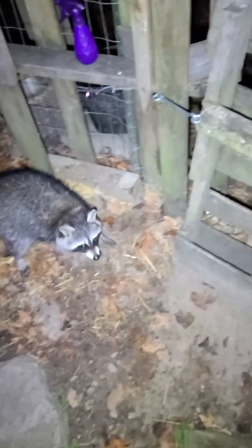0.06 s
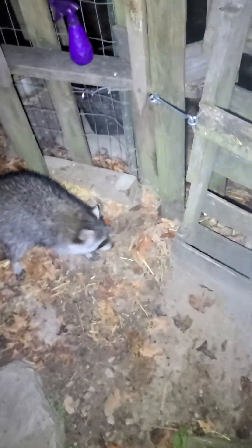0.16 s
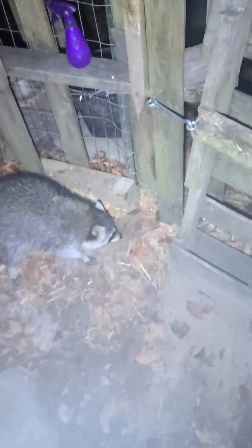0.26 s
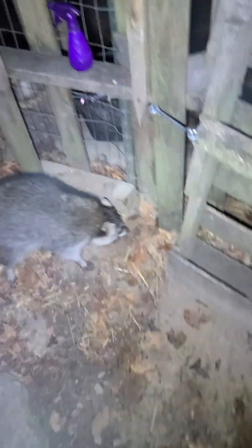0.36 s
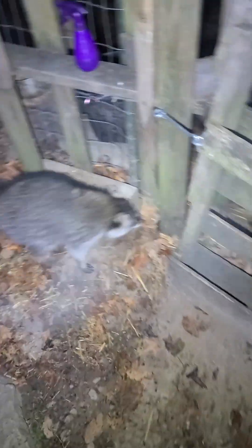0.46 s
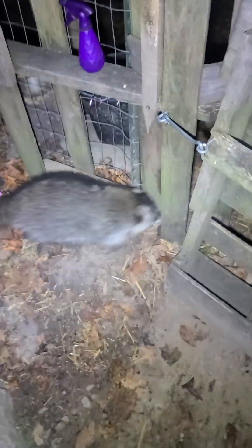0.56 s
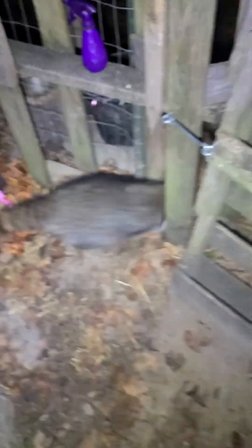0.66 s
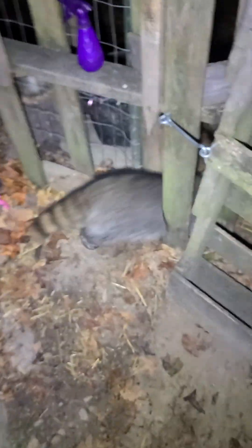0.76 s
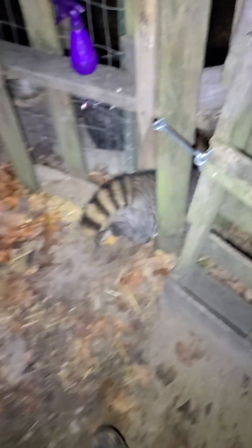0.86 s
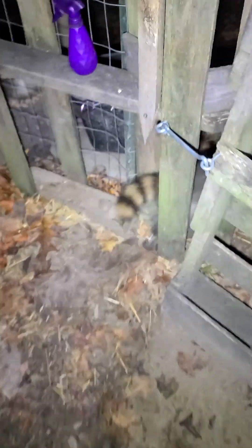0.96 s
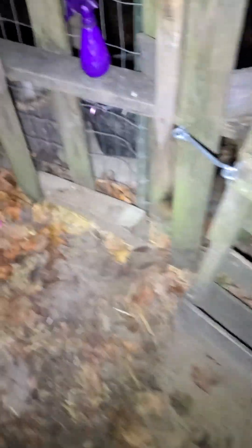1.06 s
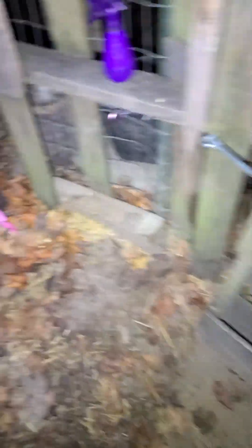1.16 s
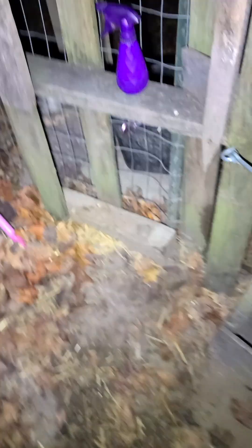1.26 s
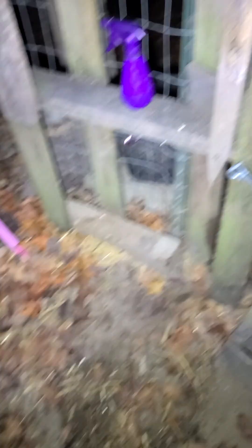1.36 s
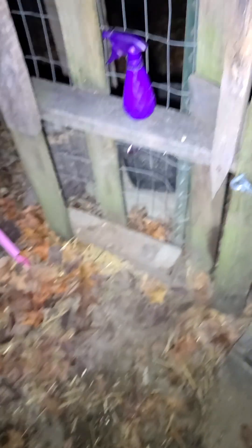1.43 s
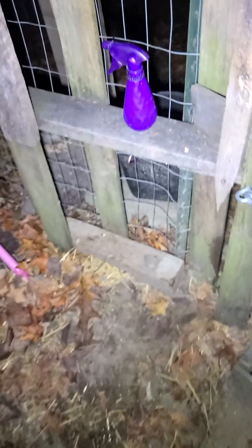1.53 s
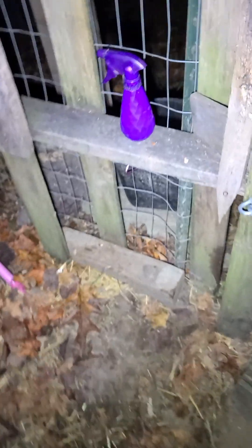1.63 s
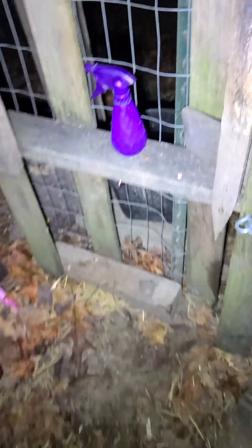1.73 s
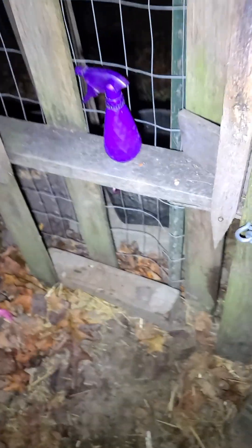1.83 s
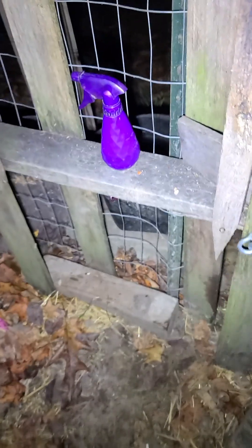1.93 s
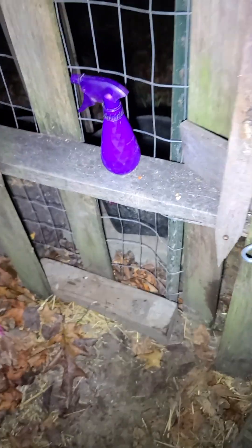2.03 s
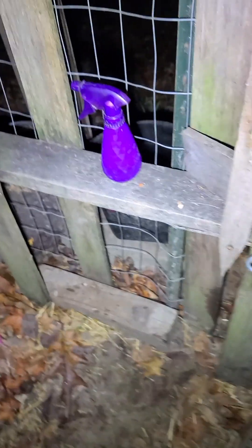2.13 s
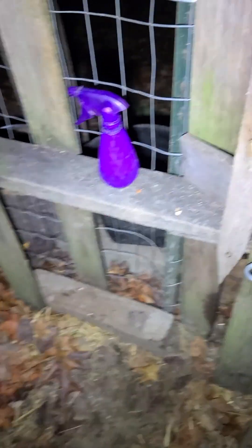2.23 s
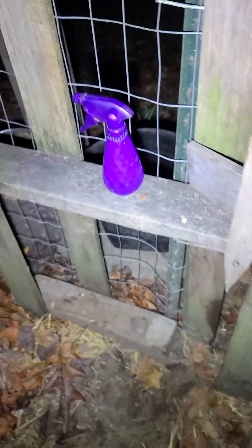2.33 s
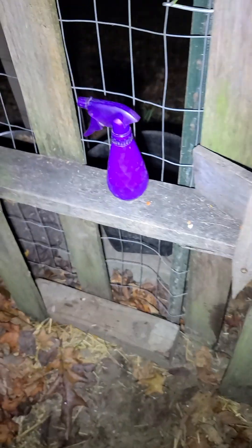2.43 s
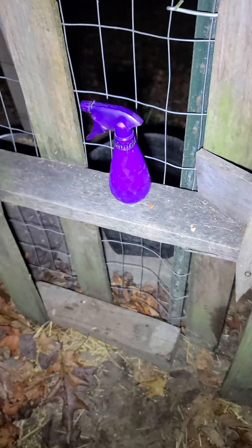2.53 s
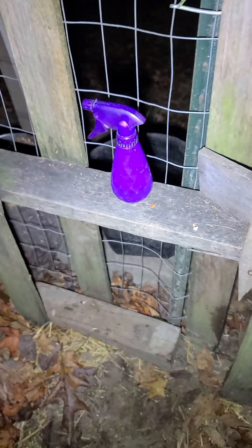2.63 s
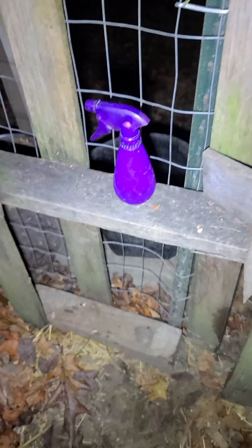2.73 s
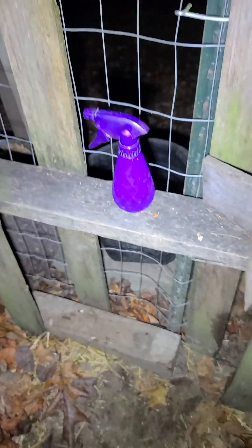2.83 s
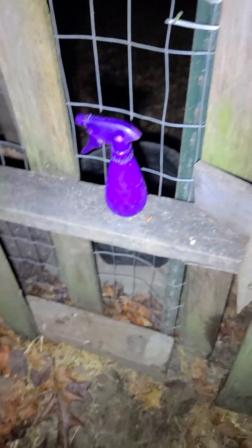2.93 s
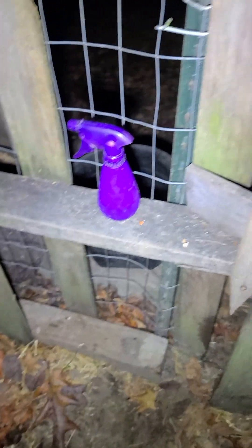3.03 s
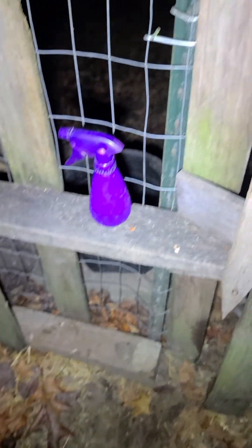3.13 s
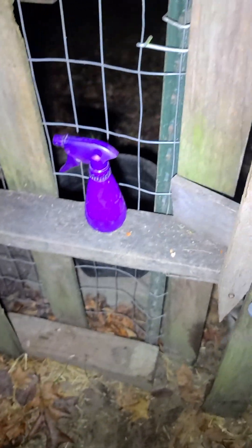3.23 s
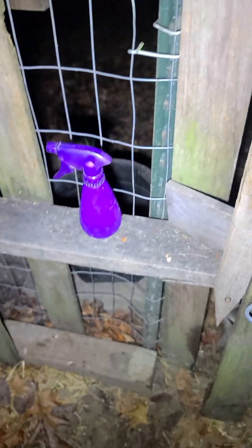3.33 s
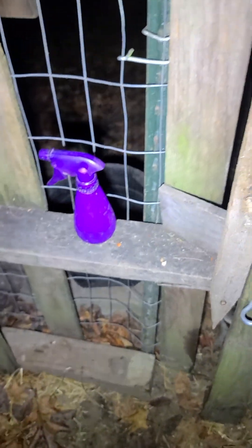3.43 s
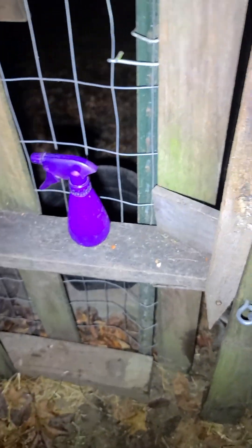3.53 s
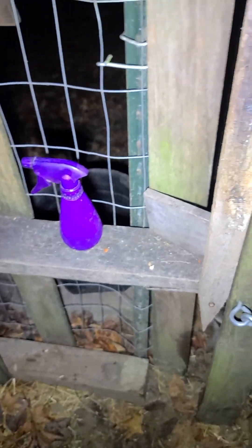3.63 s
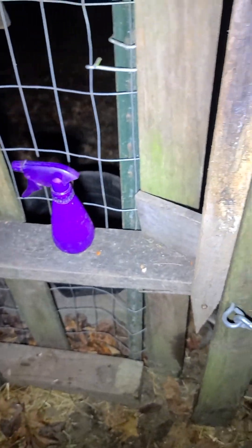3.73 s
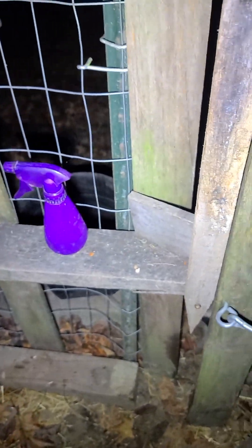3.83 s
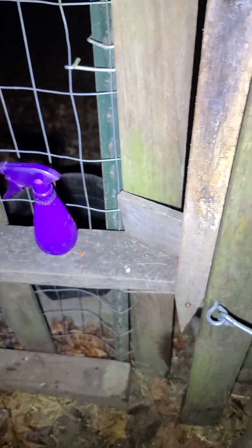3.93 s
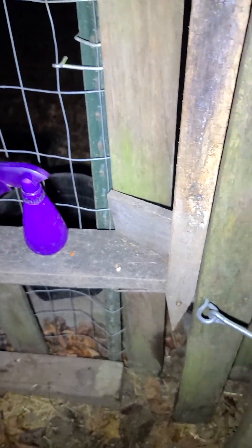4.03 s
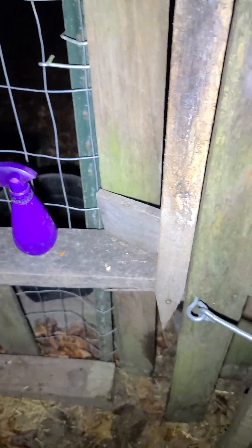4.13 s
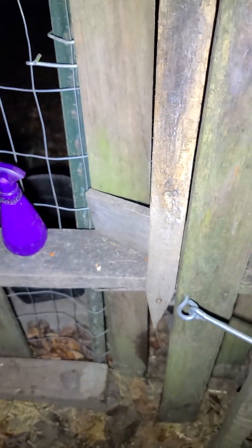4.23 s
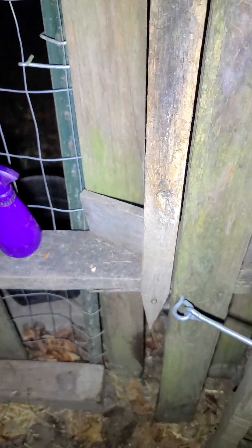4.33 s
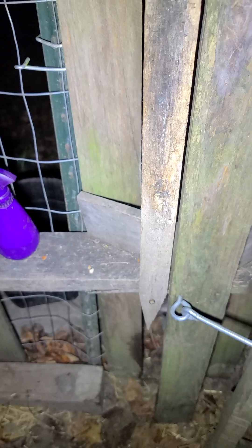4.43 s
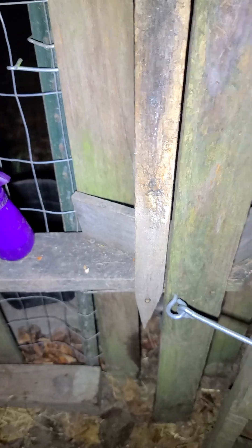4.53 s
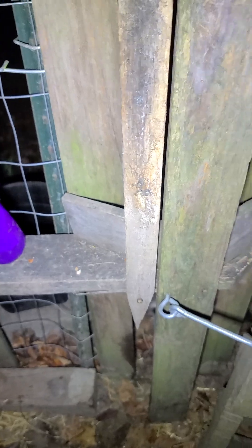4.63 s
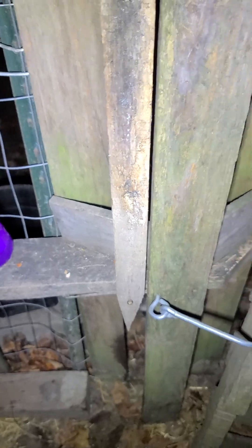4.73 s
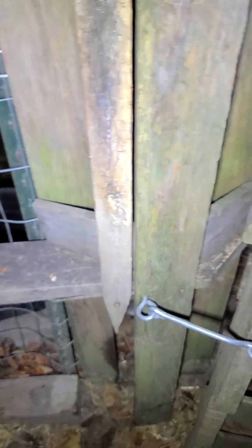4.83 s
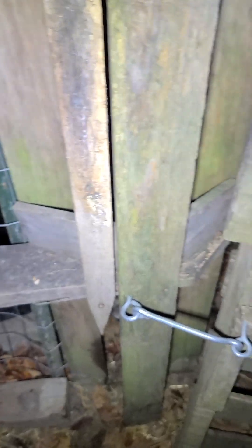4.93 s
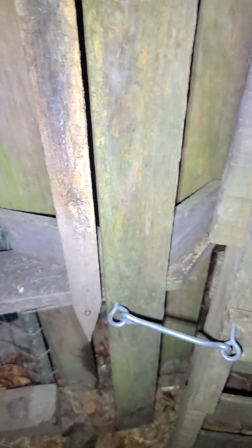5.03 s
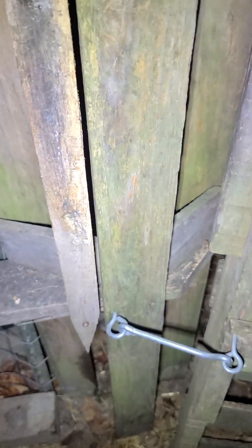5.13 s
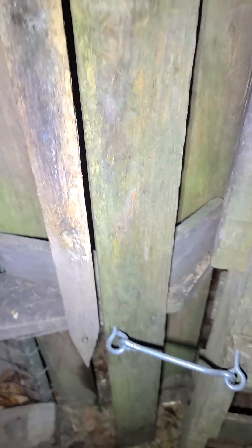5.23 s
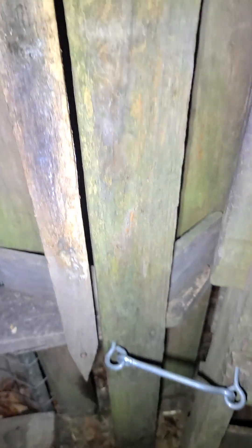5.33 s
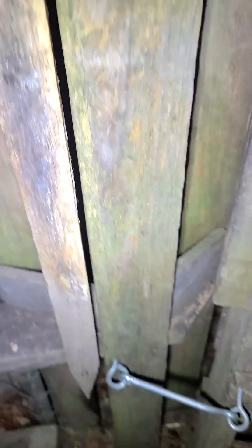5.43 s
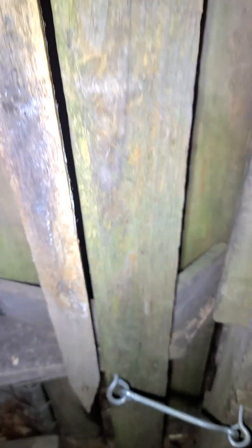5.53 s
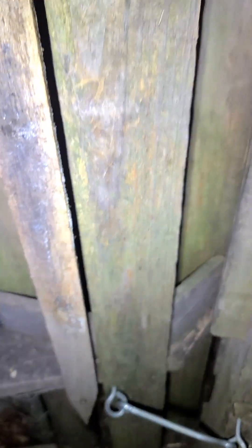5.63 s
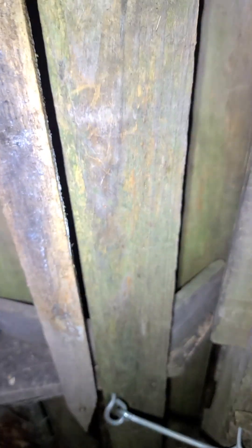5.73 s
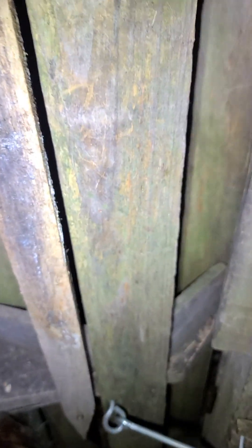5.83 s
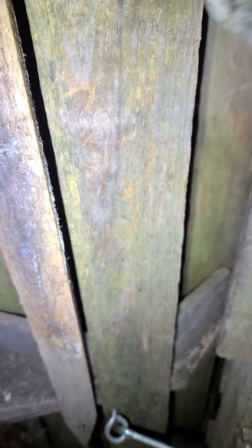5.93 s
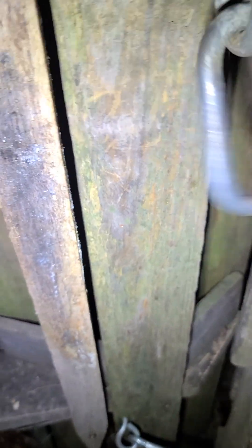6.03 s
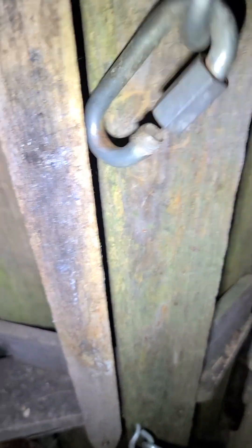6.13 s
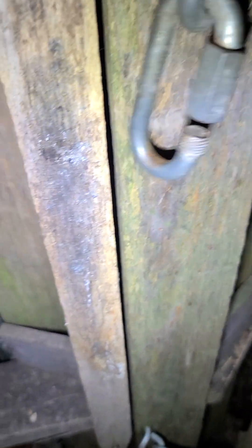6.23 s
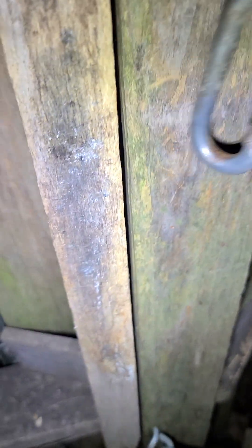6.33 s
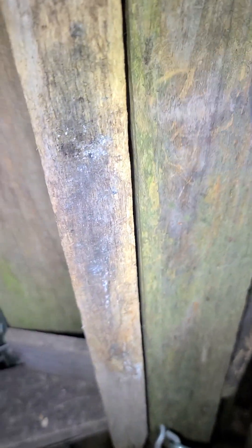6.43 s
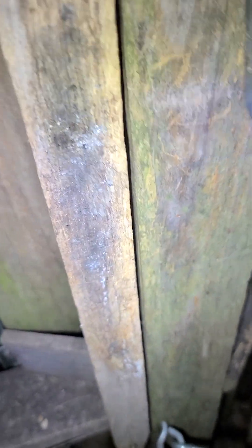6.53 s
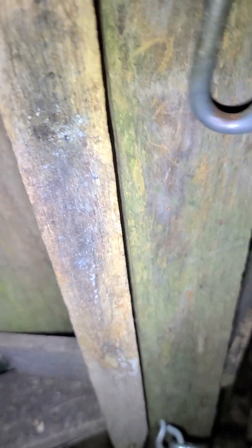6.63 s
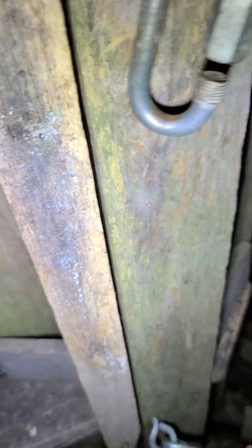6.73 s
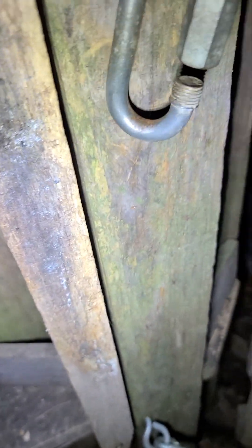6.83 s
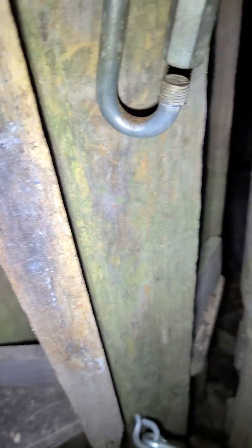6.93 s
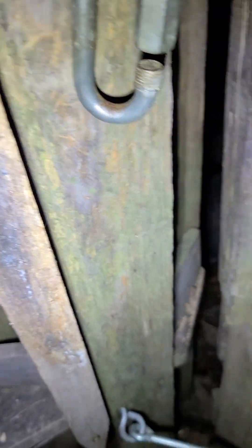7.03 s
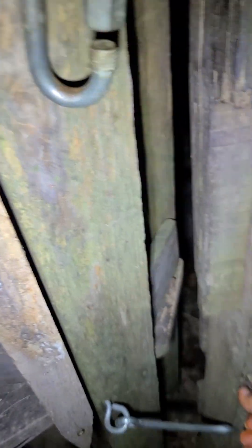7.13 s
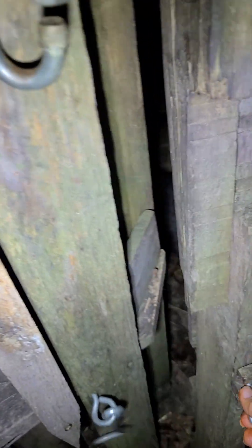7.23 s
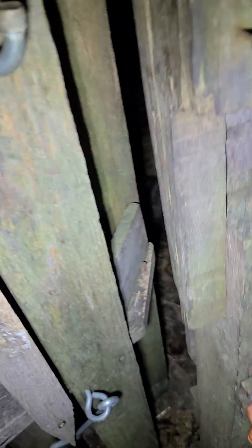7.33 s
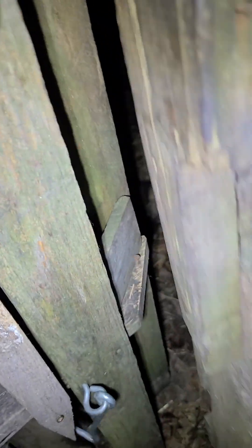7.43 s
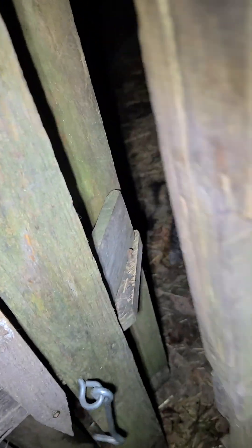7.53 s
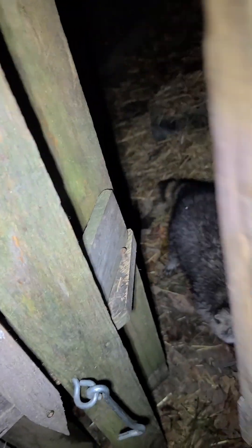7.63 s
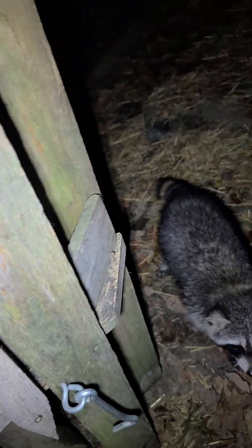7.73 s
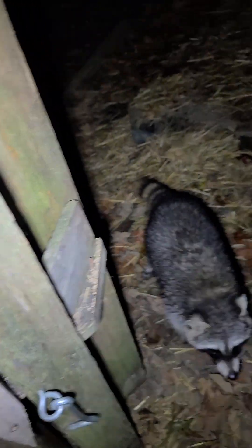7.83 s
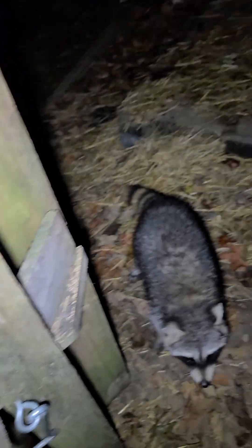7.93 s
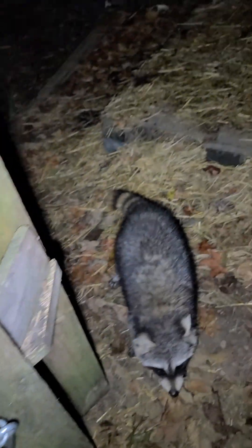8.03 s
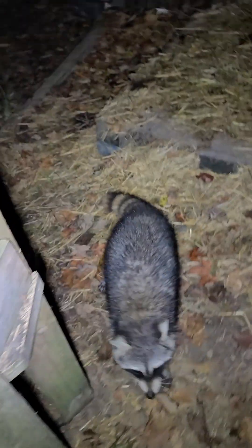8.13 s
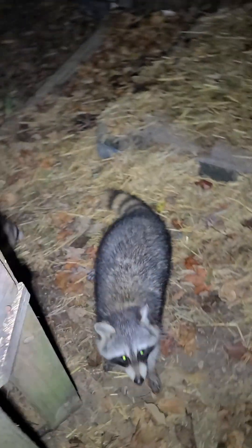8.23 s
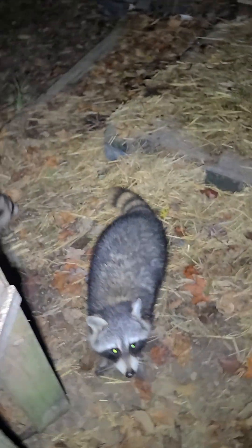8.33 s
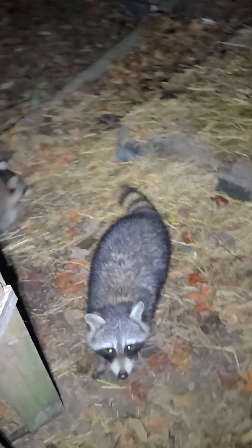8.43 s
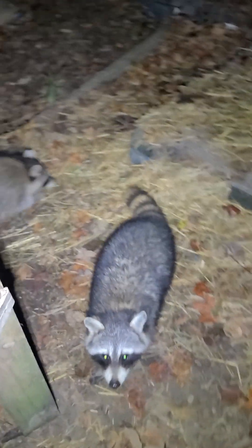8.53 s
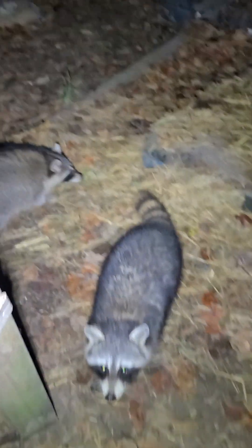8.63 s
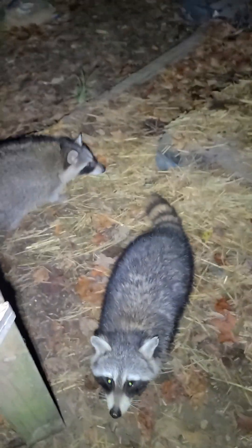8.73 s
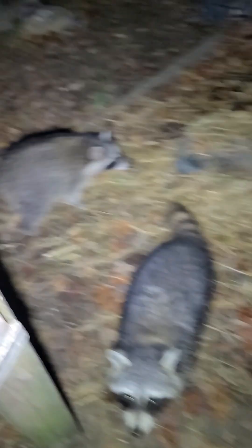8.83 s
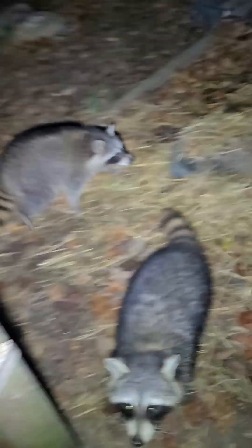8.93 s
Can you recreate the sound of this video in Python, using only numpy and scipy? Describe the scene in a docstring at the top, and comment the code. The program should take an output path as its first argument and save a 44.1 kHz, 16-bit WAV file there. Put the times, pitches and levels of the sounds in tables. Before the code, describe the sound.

A wooden gate knocks and clatters as a steel hook latch is worked loose, with crackling leaves and distant traffic behind.

```python
"""Dry leaves rustle and snap under paws and feet, over distant traffic: a yard at night, on a phone.
A wooden gate is bumped and creaks; each blow and its chatter ring the modes of the boards.
A steel link and a hook-and-eye latch are rattled loose, clinking in high, fading tones.
The gate swings open, drags over the leaves and knocks against its post."""
import sys
import numpy as np
from scipy import signal
from scipy.fft import rfft, irfft
from scipy.io import wavfile
from scipy.ndimage import uniform_filter1d

SR = 44100
rng = np.random.default_rng(int(sys.argv[2]) if len(sys.argv) > 2 else 0)


def bounce(signal):
    """Save signal as a 16-bit WAV file at the path given by the first command-line argument."""
    frames = np.transpose(np.atleast_2d(signal))
    limited = np.clip(frames, -1, 1)
    pcm = np.round(limited * 32767).astype(np.int16)
    wavfile.write(sys.argv[1], SR, pcm)


N = 395577


def undb(db):
    return 10 ** (np.asarray(db) / 20)


def unit(x):
    """Scale to rms 1."""
    return x / np.sqrt(np.mean(x ** 2))


def band(x, lo_hz, hi_hz):
    """Butterworth band-pass."""
    return signal.sosfilt(signal.butter(3, [lo_hz, hi_hz], "band", fs=SR, output="sos"), x)


def walk(rate_hz):
    """Ramps between random levels; spread near 1."""
    step = int(SR / rate_hz)
    return 1.2 * uniform_filter1d(np.repeat(rng.standard_normal(N // step + 1), step), step)[:N]


def sides(pan_db):
    """Left and right gain; pan is left minus right."""
    return undb(np.multiply.outer(pan_db, [.5, -.5]))


def place(times_s, sounds):
    """Mix stereo sounds into one track at their times."""
    out = np.zeros((2, N))
    for at_s, sound in zip(times_s, sounds):
        start = int(at_s * SR)
        out[:, start:start + sound.shape[1]] += sound[:, :N - start]
    return out


def swell(t, rise_s, t60_s):
    """Exponential rise and decay."""
    return (1 - np.exp(-t / rise_s)) * np.exp(-np.log(1000) * t / t60_s)


def grains(rate_hz, spread_db, tail_s=0.0022):
    """Random clicks, few of them large, each with a short noise tail."""
    clicks = (rng.random((2, N)) < rate_hz / SR) * undb(spread_db * rng.exponential(size=(2, N)))
    envelope = signal.lfilter([1], [1, -np.exp(-1 / (tail_s * SR))], clicks)
    return envelope * rng.standard_normal((2, N))


def jangle(count, size, depth=.3, grain_s=.006):
    """Uneven gain of ringing parts that keep touching."""
    width = int(grain_s * SR)
    return 1 + depth * np.sqrt(width) * uniform_filter1d(rng.standard_normal((count, 1, size)), width)


def traffic(level_db=-49, pan_db=-3.0):
    """Distant traffic: noise whose octaves flicker independently; the bass is alike on both sides."""
    # traffic spectrum: (frequency [Hz], relative density [dB])
    spectrum = [(15, -56), (25, -8), (59, 6.5), (130, -5), (206, -10), (277, -9), (309, -10), (363, -1),
                (796, -11), (863, -6.5), (936, -8.5), (1100, -10.5), (3080, -28.5), (12200, -40),
                (16000, -41)]
    hz, db = np.transpose(spectrum)
    f = np.fft.rfftfreq(N, 1 / SR)[1:]
    coherence = np.clip(1.02 / (1 + (f / 620) ** 3), 0, 1)
    mid, side = rfft(rng.standard_normal((2, N)))[:, 1:]
    pair = np.sqrt(1 + coherence) * mid + np.sqrt(1 - coherence) * side * np.array([[1], [-1]])
    pair *= undb(np.interp(np.log(f), np.log(hz), db))
    out = 0
    for centre in np.arange(4.5, 14.5):
        octave = np.clip(1 - abs(np.log2(f) - centre), 0, 1)
        out += undb(0.72 * walk(12)) * irfft(np.pad(pair * octave, ((0, 0), (1, 0))), N)
    mono_rms = np.sqrt(np.mean(out.mean(axis=0) ** 2))
    return undb(level_db) * out / mono_rms * sides(pan_db)[:, None]


def rustle(shove_rise_s=0.045, tread_edge_s=0.034):
    """Leaves crackle in clumps, straw scrapes the boards, the ground and the dragged gate rumble."""
    # stirring of leaves and straw: (time [s], crackle [dB], rumble [dB])
    stirring = [(0, -62, -52), (.45, -61.5, -58.5), (1.0, -53, -48.5), (1.45, -62.5, -51),
                (1.85, -61.5, -51), (2.15, -56.5, -43), (2.4, -63, -52.5), (3.4, -71.5, -53.5),
                (4.0, -70, -51), (4.75, -68.5, -53), (5.5, -67, -55), (6.17, -97, -45), (6.45, -63, -49),
                (6.7, -66, -38.5), (7.2, -50.5, -49), (7.7, -48.5, -50.5), (8.1, -43, -50),
                (8.45, -66, -55.5), (8.7, -51.5, -43), (8.97, -52, -52)]
    # gate shoved over the leaves: (peak time [s], scrape [dB], decay [s])
    shoves = [(3.82, -50.5, 0.098), (5.69, -25, 0.055), (5.87, -41.5, 0.35), (6.05, -41, 0.014),
              (6.301, -26.5, 0.0073), (6.72, -39, 0.093), (7.389, -28.5, 0.043), (7.52, -43.5, 0.45),
              (7.99, -46.5, 0.87), (8.87, -33.5, 0.0063)]
    # paws and feet press the leaves: (time [s], length [s], crackle [dB])
    treads = [(0.86, 0.12, -56), (1.06, 0.095, -53), (1.29, 0.055, -61), (1.67, 0.018, -44),
              (2.274, 0.066, -48.5), (3.03, 0.056, -55), (3.794, 0.17, -52.5), (4.47, .04, -57),
              (4.9, 0.154, -63), (5.177, 0.13, -55), (7.479, 0.11, -40.5), (8.267, 0.07, -48)]
    t = np.arange(N) / SR
    times_s, *levels_db = np.transpose(stirring)
    crackle_db, rumble_db = (np.interp(t, times_s, db) for db in levels_db)
    scrape_db = -55.5 + 0.57 * (crackle_db + 60.5)
    shove = tread = 0
    for at_s, db, decay_s in shoves:
        shove += undb(db) * np.exp(-abs(t - at_s) / np.where(t < at_s, shove_rise_s, decay_s))
    for at_s, length_s, db in treads:
        inside_s = np.minimum(t - at_s, at_s + length_s - t)
        tread += undb(db) * np.clip(inside_s / tread_edge_s + .5, 0, 1)
    leaves = grains(1100, 2.9) * undb(1.2 * walk(30) + 2.2 * walk(9))
    crackle = unit(band(leaves, 1170, 5200) + undb(-1) * band(leaves, 2400, 3330)
                   + undb(1.5) * band(leaves, 4670, 4880) + undb(-10.5) * band(leaves, 6070, 13200))
    straw = grains(600, 3.3) * undb(2.2 * walk(20))
    scrape = unit(band(straw, 326, 1305) + undb(1.5) * band(straw, 1565, 2070)
                  + undb(-7.5) * band(straw, 2110, 3520))
    ground = grains(600, 2.0)
    rumble = unit(band(ground[0] + 0.19 * ground, 65, 380))
    return ((undb(crackle_db) + tread + undb(-11) * shove) * crackle
            + (undb(scrape_db) + shove) * scrape
            + (undb(rumble_db) + undb(-16) * shove) * rumble)


def crunches_and_ticks(rise_s=0.0008):
    """Short crunches and ticks: leaves and twigs snap, the gate and latch click sharply."""
    # crunches and ticks: (time [s], level [dB], centre [Hz], hiss [dB re level], decay [s], pan [dB])
    events = [(0.118, -52, 1620, -2.5, 0.0076, -7), (0.214, -51, 3970, -26, 0.0029, -17),
              (0.4297, -54, 2010, -4, 0.043, -2.0), (0.589, -61.5, 1570, 12, 0.007, -4),
              (0.6858, -46, 1550, -2.5, 0.021, -3), (0.718, -46, 1430, -7, 0.0093, -5),
              (0.812, -39, 1790, -19, 0.0046, -11), (0.8272, -45, 1700, -15, 0.003, -8),
              (0.879, -48.5, 1900, -11, 0.066, -5), (0.937, -63, 3100, -2, 0.03, -2.5),
              (1.045, -49, 1710, -19, 0.01, -7), (1.067, -38.5, 1540, -24, 0.009, -6),
              (1.0913, -38.5, 6440, -1.5, 0.0053, -4), (1.114, -41, 1420, -12, 0.0094, -2),
              (1.14, -44, 1800, -7, 0.011, -3), (1.161, -41, 1400, -15, 0.01, 2),
              (1.29, -44.5, 2090, -22, 0.024, -5), (1.667, -46.5, 4450, -22, 0.016, -2),
              (1.749, -48, 1390, -23, 0.041, -4), (2.002, -49.5, 3170, -6.5, 0.019, -7),
              (2.143, -46, 3100, -4.5, 0.014, -2), (2.2763, -50, 2170, -19, 0.041, 2),
              (2.3, -44, 1530, -16, 0.02, -5), (3.044, -49.5, 3000, -6, 0.018, -2),
              (3.862, -46, 3450, -20, 0.006, -7), (4.478, -51, 4080, -6, 0.03, -4),
              (5.1966, -51, 1750, -17, 0.021, -8), (5.224, -50, 2070, -14, 0.046, -7),
              (5.282, -45, 2760, -29, 0.0079, -7), (6.229, -31, 1800, -2, 0.0086, 2),
              (6.4514, -56, 1560, -1, 0.019, -6), (6.712, -51, 9050, 9, 0.008, 0),
              (6.817, -56, 9500, -12, 0.0026, 0), (6.765, -55, 1900, 3, 0.006, 0),
              (6.8451, -30, 1800, -38, 0.0068, -5), (7.347, -23, 10000, -6, 0.0039, 7),
              (7.368, -22, 5400, -2, 0.004, -6), (7.505, -34, 5000, -6, 0.006, 0),
              (7.52, -45, 5440, -6, 0.008, -3), (7.691, -38, 1880, -10, 0.0051, -10),
              (7.802, -42.5, 1770, -2, 0.0087, -2), (7.8241, -57, 1400, -9, 0.016, -9),
              (7.853, -39.5, 2010, -32, 0.034, -3), (8.026, -32.5, 1500, -16, 0.035, -4),
              (8.2008, -47.5, 6140, 6, 0.0056, -4), (8.23, -41, 2950, -13, 0.0019, -11),
              (8.114, -36.5, 2090, -8, 0.013, -3), (8.379, -52, 1500, -4, 0.042, -4),
              (8.29, -43.5, 1530, -1, 0.021, -8), (8.676, -41, 1480, -15, 0.0088, -9),
              (8.701, -42, 1410, -22, 0.073, -12), (8.8075, -41.5, 1590, -13, 0.013, -11)]
    times_s, db, centre_hz, hiss_db, decay_s, pan_db = np.transpose(events)
    t = np.arange(6000) / SR
    noise = rng.standard_normal((len(events), 2, len(t)))
    crunch = noise * abs(noise)
    crunch[:, :, 40] = 3.9  # opening click
    bursts = np.array([unit(band(x, hz / 1.31, hz * 1.21)) + hiss * unit(band(x, 2520, 10900))
                       for x, hz, hiss in zip(crunch, centre_hz, undb(hiss_db))])
    envelope = swell(t, rise_s, np.log(1000) * np.clip(decay_s, .002, .06)[:, None])
    envelope *= undb(db)[:, None] / envelope.max(axis=1, keepdims=True)
    return place(times_s, bursts * envelope[:, None] * sides(pan_db)[:, :, None])


def drones():
    """Faint narrow bands of noise swell and fade, centred."""
    # drones: (time [s], length [s], centre [Hz], width [Hz], level [dB])
    noise_bands = [(0.8, 2.5, 385, 40, -58), (2.95, .75, 895, 12, -63), (3.7, 1.3, 490, 16, -59),
                   (5.0, .45, 1000, 14, -68), (2.4, .7, 1000, 20, -69), (3.95, .3, 3950, 300, -70),
                   (.86, .15, 3000, 300, -60), (6.45, .45, 3050, 350, -62)]
    out = np.zeros((2, N))
    for at_s, length_s, hz, width_hz, db in noise_bands:
        size = int(length_s * SR)
        noise = unit(band(rng.standard_normal(size), hz - width_hz / 2, hz + width_hz / 2))
        out += place([at_s], [undb(db) * noise * np.sqrt(np.hanning(size)) * np.ones((2, 1))])
    return out


def wood_response(f, frame_hz, board_hz, crack_hz):
    """Gate spectrum per blow: a random share of its modes, plus four rings of the struck slat."""
    # gate modes: (frequency [Hz], width [Hz], gain [dB])
    modes = [(72.7, 9.4, -1.5), (115.5, 4.2, 11), (145.3, 85, 13.5), (204, 42, 3.5), (251, 44, 5.5),
             (368.3, 9, 16), (430, 240, 18.5), (516, 8.5, 7.5), (593, 38, 0.5), (746, 43, 16),
             (975, 64, 14.5), (1075, 54, 7), (1243, 53, 4.5), (1364, 47, 10.5), (1503, 300, 12),
             (1751, 54, 15.5), (1955, 60, 11), (2084, 150, 8.5), (2600, 400, 10.5), (2970, 27, -1),
             (2920, 29, -8), (3840, 94, 7.5), (5200, 400, -38), (5360, 630, -10), (5850, 1400, 2)]
    # frame, board, overtone and crack rings: (gain [dB])
    slat_db = [24.7, 22.8, 13, 21.4]
    slat_q = 16, 18, 18, 18
    overtone_hz = 1.739 * board_hz * np.exp(0.017 * rng.standard_normal(len(board_hz)))
    hz, width_hz, db = np.transpose(modes)
    share = undb(db + 3.9 * rng.standard_normal((len(board_hz), 2, len(modes))))
    damping = 1j * width_hz[:, None] * f
    direct = .5 / (1 + 1j * f / 5000)
    response = share @ (damping / (hz[:, None] ** 2 - f ** 2 + damping)) + direct
    for ring_hz, q, ring_db in zip((frame_hz, board_hz, overtone_hz, crack_hz), slat_q, slat_db):
        ring_hz = ring_hz[:, None, None]
        damping = 1j * f * ring_hz / q
        response += undb(ring_db) * damping / (ring_hz ** 2 - f ** 2 + damping)
    return response


def knocks(contact_s=0.0016, size=8192):
    """Blows and the chatter of loose parts ring the gate in five bands."""
    # blows: (time [s], board ring [dB], post thud [dB re ring], frame [dB re ring], crack [dB re ring],
    # frame [Hz], board [Hz], crack [Hz], base rattle t60 [s], pan [dB])
    blows = [(1.1436, -42, 4, 3, -16, 250, 1290, 2560, 0.019, 0),
             (1.4185, -57.5, 16.5, 10, 6, 393, 980, 4600, 0.13, -4),
             (3.642, -29, 9, 9.5, 6, 560, 1045, 4000, 0.16, -1.5),
             (3.688, -28, -7, 4.5, -3, 515, 1400, 3680, 0.076, -2),
             (3.7892, -24, -13, -6, -10, 470, 1850, 3180, 0.1, -1.5),
             (3.8766, -32, 9, 6, -5, 393, 1046, 3380, 0.041, 0),
             (3.932, -40.5, 3.5, -3, -2.5, 337, 895, 3750, 0.14, 4),
             (4.012, -47.5, -17, -10, -4, 400, 1650, 3900, 0.04, -2),
             (4.133, -55.5, -14, 16.5, -15, 396, 1070, 3996, 0.06, 5),
             (4.15, -48.5, -11, -16, -3.5, 376.7, 1490, 3030, 0.18, -1),
             (5.457, -39, -13, -4.5, -28, 450, 937, 2490, 0.51, 1),
             (5.553, -17, -32, -14, 2.5, 554, 1580, 2630, 0.097, -0.5),
             (5.614, -10.5, -55, -18.5, -5.5, 377, 1186, 2950, 0.053, 2),
             (5.667, -9.5, -39, -7.5, -4, 585, 1470, 2720, 0.083, 0),
             (5.6886, -31.5, -24, 8.5, -17, 645, 990, 2840, 0.14, -3),
             (5.72, -11, -29, -5.5, -2, 976, 920, 2950, 0.098, -2),
             (5.731, -13, -34, -3, -4, 580, 1560, 2520, 0.092, -2.5),
             (5.7387, -11, -47, -6.5, -6, 750, 1580, 2800, 0.033, -6),
             (5.8285, -12, -42, -5, -4, 920, 950, 2720, 0.048, -4),
             (5.841, -13.5, -46, -5, -1, 776, 966, 3980, 0.083, 0),
             (5.8579, -18.5, -41, -30, -9, 730, 1014, 2440, 0.04, -2),
             (5.971, -4.5, -54, -27, -8, 740, 1148, 1920, 0.04, -1.5),
             (6.0522, -9, -13.5, -8, -14.5, 390, 1075, 1990, 0.04, 0.5),
             (6.112, -39.5, 3, -8, -29, 436, 1070, 2800, 0.19, 2),
             (6.171, -44, -44, 11.5, -31, 394, 990, 2420, 0.016, -1),
             (6.1854, -44, 10, 3, -33, 367, 1080, 2450, 0.12, -3),
             (6.2374, -11, -6, -1.5, -16.5, 810, 930, 4200, 0.093, -3.5),
             (6.2724, -13, -26, -22, -1.5, 760, 1136, 4520, 0.085, -2),
             (6.302, -22, -27, -17, -6, 372, 2090, 4550, 0.039, -3),
             (6.371, -37.5, -12, -18, -22, 356, 1100, 2570, 0.033, -3),
             (6.6257, -28.5, -24, -12, -14, 700, 1525, 4400, 0.18, 0),
             (6.6386, -8.5, -18.5, -15, -4, 402, 1150, 2070, 0.031, 0.5),
             (6.7291, -20.5, -36, -14.5, 1, 397, 1400, 4350, 0.093, -2),
             (6.948, -26, -4.5, -2, -12, 374, 920, 2420, 0.21, 0),
             (6.9719, -17.5, -16, -3.5, 0, 660, 1790, 2860, 0.06, -1),
             (6.9875, -21, -38, -24, 4.5, 850, 1850, 4400, 0.045, -2),
             (7.0613, -21.5, -40, -10, -3.5, 770, 1750, 4300, 0.075, -4),
             (7.1762, -35.5, -29, -5, -20, 745, 1510, 3070, 0.26, 0),
             (7.208, -22.5, -34, -4, -7.5, 740, 1680, 4650, 0.1, -1.5),
             (7.238, -18.5, -24, -6.5, -8.5, 534, 1710, 2420, 0.15, 2.5),
             (7.2632, -17.5, -23, -17, -2.5, 397, 1460, 4230, 0.037, -6),
             (7.3388, -9, -50, -13, -3.5, 380, 1450, 3100, 0.05, -0.5),
             (7.3461, -15.5, -16, -14, 5, 363, 1550, 4500, 0.046, 1),
             (7.3613, -19, -22, -26, 0, 885, 1440, 3860, 0.062, -6),
             (7.4067, -10, -18.5, -5.5, -3.5, 332, 1446, 4620, 0.082, -3),
             (7.481, -9, -40, -11.5, -14.5, 707, 1570, 4740, 0.037, 0.5),
             (7.493, -18.5, -36, -30, -0.5, 663, 917, 4580, 0.19, -2.5),
             (7.5604, -27, -3.5, -6.5, -7, 580, 1800, 3200, 0.16, -1),
             (7.6156, -22.5, -21, -1, -4.5, 533, 900, 3130, 0.086, -4.5),
             (7.658, -29.5, -16, -1, -8, 860, 965, 3270, 0.06, -4.5),
             (7.716, -42, -12, -22, -2, 358, 1730, 2570, 0.044, -17),
             (7.7634, -42, -17, 3, 1.5, 400, 1110, 3070, 0.3, -7),
             (7.9118, -26.5, 4.5, 4, -31, 403.4, 1120, 2600, 0.13, -1.5),
             (7.9552, -12.5, -34, -19, -16.5, 805, 1826, 3000, 0.05, -8),
             (7.9821, -22.5, -8, -1, -2, 470, 1450, 4500, 0.13, -2.5),
             (8.0755, -29.5, -12, 0, -2, 545, 1500, 2850, 0.13, -2),
             (8.1737, -35.5, -21, -21, 4, 401, 1760, 3150, 0.025, -4),
             (8.3103, -34, -7, -2.5, -4, 500, 1080, 2830, 0.21, -1.5),
             (8.475, -28, -14, -28, 1.5, 450, 2450, 2830, 0.031, -2),
             (8.554, -35, -0.5, -11, -17, 729, 990, 2800, 0.14, -3),
             (8.6357, -33, 7.5, 5.5, -9, 517, 890, 2970, 0.11, -1.5),
             (8.733, -10, -18, -8.5, -38, 698, 896, 2420, 0.035, 0),
             (8.785, -32.5, -1, 3, -23, 804, 920, 2570, 0.08, -4),
             (8.8381, -24.5, -11, -20, -11.5, 550, 1510, 2900, 0.23, -6.5),
             (8.873, -12, -3, 4, -7.5, 492, 1260, 2800, 0.025, -2.5),
             (8.8843, -16.5, -0.5, -1.5, -2, 274, 1060, 2400, 0.036, -6.5),
             (8.922, -35.5, 3, 1, -32, 705, 1530, 2630, 0.16, -3),
             (8.9444, -30, -4, -22, -7.5, 886, 1430, 2840, 0.4, -5.5)]
    # thud, frame, board, crack and snap bands: (low [Hz], high [Hz])
    bands_hz = [(70, 250), (250, 900), (900, 2400), (2400, 6000), (6000, 12000)]
    # one value per band
    alike = [0.9, 0.88, 0.4, 0.25, 0.09]  # weight of chatter common to both microphones [0-1]
    spikiness = [1, 1, 1.5, 2, 2]  # thins chatter to single touches [exponent]
    linger = [1.5, 1.3, 0.85, 0.6, 0.36]  # treble dies first [t60 factor]
    first_contact = [6.7, 4, 1.4, 0.97, 0.52]  # extra strength at onset [gain]
    tremble_db = [-20, -12, -33, -22, -22]  # loose slats and wire shake on [dB]
    lag_s = [.00025, .0002, .00016, .00062, .00062]  # delay at the right microphone [s]
    times_s, ring_db, thud_db, frame_db, crack_db, *slat_hz, t60_s, pan_db = np.transpose(blows)
    snap_db = -12.5 + 1.37 * crack_db
    t60_s = np.clip(t60_s, .005, .3)[:, None, None]
    t = np.arange(size) / SR
    wood = wood_response(np.fft.rfftfreq(size, 1 / SR), *slat_hz)
    chatter = rng.standard_normal((len(blows), 3, size))  # left, common, right
    sounds = 0
    for i, band_db in enumerate((thud_db, frame_db, 0, crack_db, snap_db)):
        touches = chatter * abs(chatter[:, 1:2]) ** spikiness[i]
        late = np.roll(touches, int(lag_s[i] * SR), axis=2)
        common = np.stack([touches[:, 1], late[:, 1]], axis=1)
        separate = np.stack([touches[:, 0], late[:, 2]], axis=1)
        envelope = swell(t, contact_s, linger[i] * t60_s)
        envelope *= 1 + first_contact[i] * np.exp(-t / 0.0013)
        envelope += undb(tremble_db[i]) * swell(t, rise_s=0.0015, t60_s=0.089)
        force = (np.sqrt(alike[i]) * common + 2 * np.sqrt(1 - alike[i]) * separate) * envelope
        ring = band(irfft(rfft(force) * wood, size), *bands_hz[i])
        peak_rms = np.sqrt(uniform_filter1d(np.mean(ring ** 2, axis=1), size=200).max(axis=1))
        sounds += ring * (undb(ring_db + band_db) / peak_rms)[:, None, None]
    return place(times_s, sounds * sides(pan_db)[:, :, None])


def creaks(jitter=0.151):
    """The gate sticks and slips; the uneven slips ring one resonance."""
    # creaks: (time [s], length [s], slip rate [Hz], resonance [Hz], width [Hz], level [dB], pan [dB])
    slip_runs = [(2.136, 0.051, 120, 352, 178, -38.5, 2.5), (6.811, 0.07, 193, 340, 91, -31, -2),
                 (7.991, 0.17, 140, 584, 70, -40, -7.5), (8.359, 0.08, 120, 188, 91, -42, 1.5),
                 (8.429, 0.048, 130, 294, 191, -37.5, -5.5)]
    out = np.zeros((2, N))
    for at_s, length_s, rate_hz, hz, width_hz, db, pan_db in slip_runs:
        t = np.arange(int((length_s + 0.012) * SR)) / SR
        wobble = np.repeat(rng.standard_normal(64), 256)[:len(t)]
        cycles = np.cumsum(rate_hz * (1 + jitter * wobble)) / SR
        slips = np.diff(np.floor(cycles), prepend=0)
        envelope = np.sqrt(np.sin(np.pi * np.clip(t / length_s, 0, 1)))
        ring = band(slips * envelope, hz - width_hz / 2, hz + width_hz / 2)
        out += place([at_s], [undb(db) * unit(ring) * sides(pan_db)[:, None]])
    return out


def gate_rings():
    """Post, boards and staple ring in single tones after some blows; low ones build more slowly."""
    # rings: (time [s], frequency [Hz], level [dB], t60 [s], pan [dB])
    rings = [(3.645, 190, -27, 0.11, 2), (3.646, 4100, -26, 0.024, -5), (3.79, 4800, -35, 0.027, 0),
             (3.788, 2500, -47, 0.053, 2), (5.613, 2070, -8.5, 0.031, -3), (6.052, 1900, -20, 0.058, 0),
             (5.972, 2046, -10, .03, 0), (6.056, 135, -23, .2, 0), (6.241, 125, -20, .17, 0),
             (6.6395, 2120, -8, 0.025, -5), (3.878, 390, -20, 0.077, 0), (3.878, 4100, -30, 0.047, -2),
             (7.621, 58, -28.5, 0.34, 5), (8.476, 3090, -20, 0.029, -10), (8.7328, 990, -6, 0.07, -6),
             (8.839, 1505, -30, 0.08, -6), (8.737, 81, -29, 0.32, 0), (8.866, 69, -14, 0.2, -9),
             (8.875, 446, -6.5, 0.033, -7.5), (8.879, 95, -14, 0.16, 1)]
    t = np.arange(SR // 2) / SR
    times_s, hz, db, t60_s, pan_db = np.array(rings).T[:, :, None, None]
    phase_rad = np.array([[0], [.8]])
    envelope = swell(t, 0.00022 + 0.19 / hz, t60_s) * jangle(len(rings), len(t))
    tones = undb(db) * envelope * np.sin(2 * np.pi * hz * t + phase_rad)
    return place(times_s.ravel(), tones * sides(pan_db.ravel())[:, :, None])


def metal_rings():
    """The link, hook, eye and wire ring in lone thin metallic tones."""
    # rings: (time [s], level [dB], frequency [Hz], t60 [s], rise [s])
    rings = [(3.933, -41, 3970, 0.046, 0.0024), (4.011, -52, 3880, 0.05, 0.0016),
             (4.135, -63, 4000, 0.06, 0.002), (5.555, -43, 9146, 0.089, 0.002),
             (5.555, -36, 6900, 0.09, 0.002), (5.679, -51, 14800, 0.06, 0.003),
             (5.719, -32, 14880, 0.04, 0.002), (6.985, -44, 15600, 0.14, 0.0043),
             (5.972, -22, 12410, 0.05, 0.0014), (6.64, -21, 12410, 0.045, 0.001),
             (6.986, -27, 7740, 0.16, 0.003), (7.21, -44, 7950, 0.08, 0.003),
             (7.266, -40, 8000, 0.45, .005), (7.36, -25, 8021, .22, .1), (7.36, -29, 15575, .2, .1),
             (7.41, -45, 5850, .25, 0.022), (7.49, -29, 5850, 0.11, 0.013), (8.621, -61, 7550, 0.33, 0.034)]
    t = np.arange(int(.4 * SR)) / SR
    times_s, db, hz, t60_s, rise_s = np.array(rings).T[:, :, None, None]
    envelope = swell(t, rise_s, 3 * t60_s) ** 3  # S-shaped onset
    envelope /= envelope.max(axis=2, keepdims=True)
    envelope *= jangle(len(rings), len(t))
    tones = np.sin(2 * np.pi * (hz * t + rng.random((len(rings), 2, 1))))
    return place(times_s.ravel(), undb(db) * envelope * tones)


def clinks(hits, modes, pan_db, spread_db=8):
    """Struck steel: fading modes, each at a random level and phase; grip shortens the ring."""
    t = np.arange(int(.4 * SR)) / SR
    times_s, hit_db, db_per_octave, grip = np.array(hits).T[:, :, None, None, None]
    hz, mode_db, t60_s = np.array(modes).T[:, :, None]
    phase = rng.random((len(hits), 2, len(modes), 1))
    scatter_db = spread_db * (rng.random((len(hits), 1, len(modes), 1)) - .5)
    tones = np.sin(2 * np.pi * (hz * t + phase)) * swell(t, .001, t60_s * (1 - .85 * grip))
    tones *= jangle(len(hits) * len(modes), len(t)).reshape(len(hits), 1, len(modes), -1)
    tones *= undb(hit_db + mode_db + db_per_octave * np.log2(hz / 11000) + scatter_db)
    return place(times_s.ravel(), tones.sum(axis=2) * sides(pan_db)[:, None])


def latch():
    """The link swings against its staple; the hook jumps in its eye."""
    # contacts: (time [s], level [dB], brightness [dB/octave], grip [0 free - 1 held])
    link_hits = [(5.554, -24, -9, 0.73), (5.668, -27, -2, 0.93), (5.679, -44, 0.1, 0.51),
                 (5.7185, -23.5, -8, 0.84), (5.734, -26, -11, 0.84), (5.8276, -29, -14, 0.63),
                 (5.8574, -39, 2, 0.79), (5.972, -39, -7, 0.82), (6.2415, -25.5, -9, 0.058),
                 (6.272, -17.5, -6, 0.36), (6.2819, -19, -8, 0.12), (6.3033, -46, 11, 0.53)]
    hook_hits = [(6.9735, -37, 5, 0.7), (6.987, -24, 0.1, 0.4), (7.2644, -26.5, -6, 0.47),
                 (7.3467, -31, 0.1, 0.4), (7.3644, -17, 2, 0.43), (7.4107, -26, 12, 0.27),
                 (7.486, -31, -4.5, 0.18)]
    # steel modes: (frequency [Hz], gain [dB], free t60 [s])
    link_modes = [(4680, -7, .09), (6821, -14, .05), (8170, -4, .07), (8945, -3, .09), (9146, -9, .06),
                  (10500, -20, .06), (11400, 5, .15), (12370, -1, .05), (12590, -27, .24),
                  (13950, -14, .06), (14880, -10, .07)]
    hook_modes = [(3623, -2, .095), (4500, -3, .04), (5850, -16, .15), (10700, -13, .3), (13190, -4, .25),
                  (15590, -26, .08)]
    return clinks(link_hits, link_modes, pan_db=3.4) + clinks(hook_hits, hook_modes, pan_db=0.1)


def yard_echo(x, t60_s=0.061, level_db=-42):
    """Fence and ground return a short, dull tail."""
    t = np.arange(int(.4 * SR)) / SR
    tail = band(rng.standard_normal((2, len(t))), 150, 6500) * np.exp(-np.log(1000) * t / t60_s)
    return undb(level_db) * signal.fftconvolve(x, tail / np.linalg.norm(tail[0]), axes=1)[:, :N]


def scene():
    """Traffic, leaves, ticks and drones under the gate and its echo."""
    background = traffic() + rustle() + crunches_and_ticks() + drones()
    gate = knocks() + creaks() + gate_rings() + metal_rings() + latch()
    return background + gate + yard_echo(gate)


def record(dry):
    """The phone colours the sound, rolls off the top, clips peaks and cuts above 16.3 kHz."""
    # case and port colour: (centre [Hz], width [Hz], gain [dB])
    colour = [(2220, 600, -3), (6280, 15100, -5), (9020, 2500, 6)]
    for hz, width_hz, db in colour:
        dry = dry + (undb(db) - 1) * signal.lfilter(*signal.iirpeak(hz, hz / width_hz, fs=SR), dry)
    dulled = signal.sosfilt(signal.butter(2, 15200, fs=SR, output="sos"), dry)
    clipped = np.clip(dulled, -1, 1)
    return signal.sosfilt(signal.ellip(10, .2, 90, 16300, fs=SR, output="sos"), clipped)


dry = scene()
out = record(dry)
bounce(out)
```